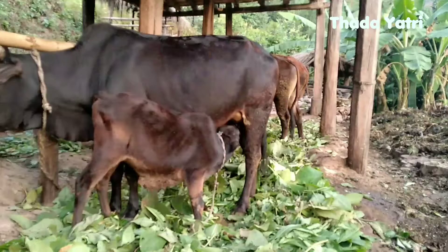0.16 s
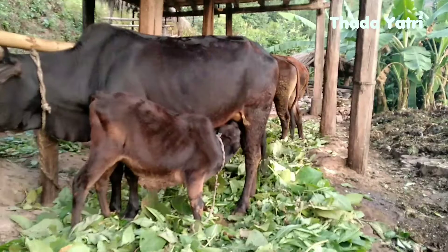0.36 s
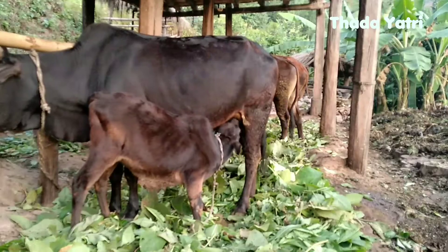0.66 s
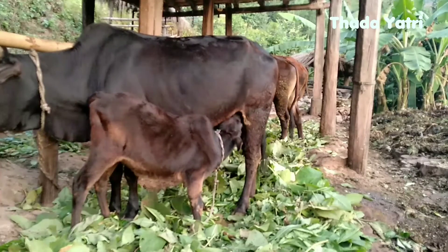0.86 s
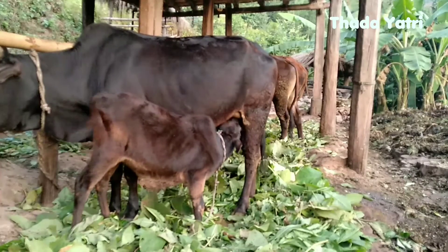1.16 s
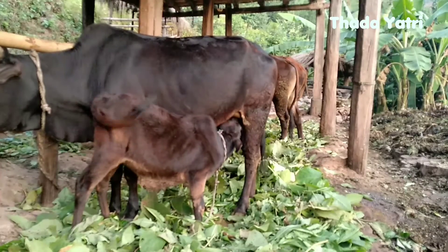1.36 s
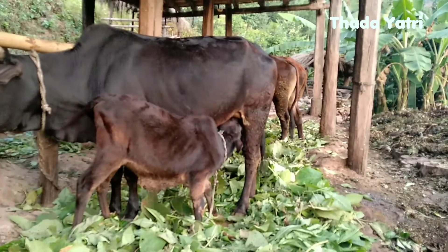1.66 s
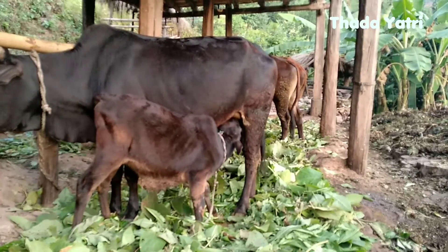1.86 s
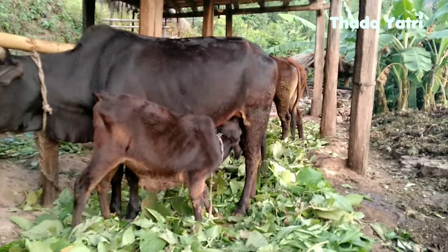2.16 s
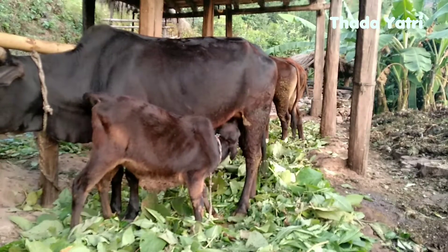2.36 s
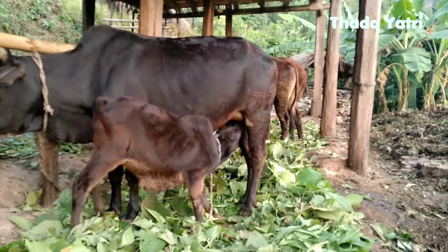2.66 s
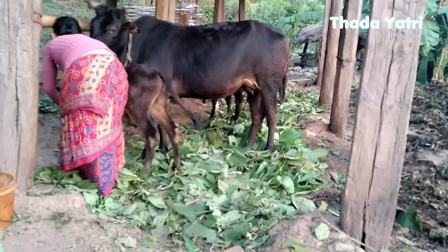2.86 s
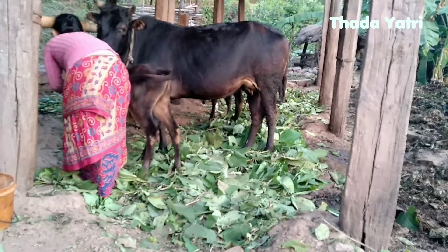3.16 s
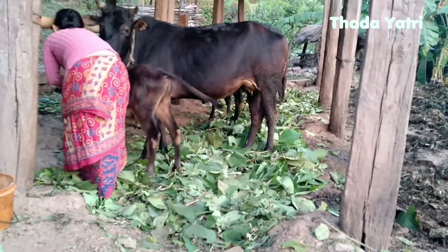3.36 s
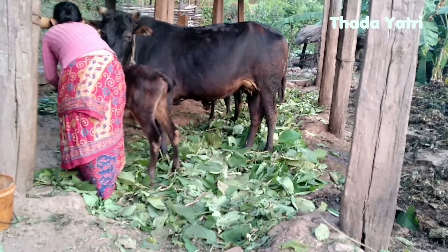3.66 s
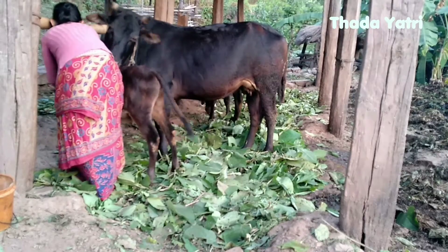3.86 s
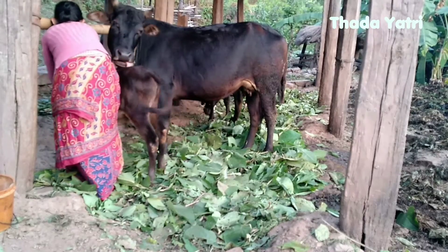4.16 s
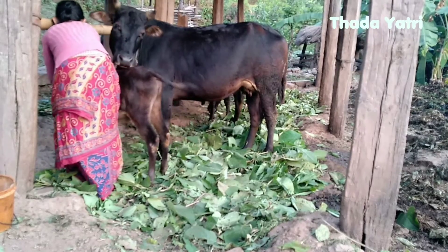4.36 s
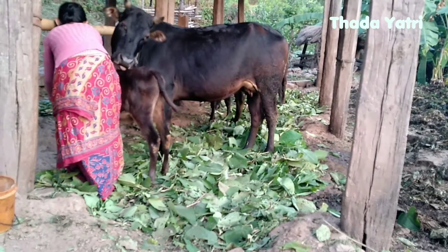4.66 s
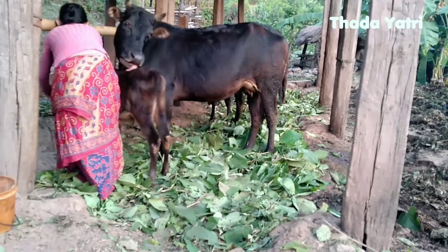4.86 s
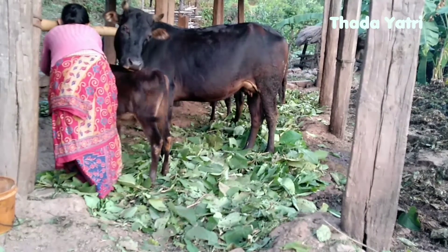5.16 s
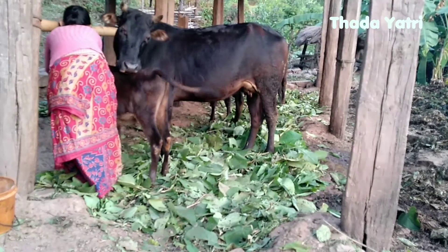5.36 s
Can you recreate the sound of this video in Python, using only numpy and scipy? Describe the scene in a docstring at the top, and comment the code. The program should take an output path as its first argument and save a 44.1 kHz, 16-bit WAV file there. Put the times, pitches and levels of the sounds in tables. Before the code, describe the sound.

Close churning in a pot, knocking and splashing, lasts a fraction of a second. Then an outdoor shed, heard from a few paces: buzzy bird calls, thin falling chick peeps, three soft clucks, crunching leaves, snapping stalks and low thuds. The peeping thins out midway, leaving rustles and knocks, before a hoarse, drawn-out rooster crow rises in the yard and is still going at the end.

```python
"""Heard first, for a moment: a butter churn knocks and sloshes in a clay pot; then come the sounds of an open cattle shed.
Knocks and grains excite the pot's resonances. Chicks, small birds and a hen call through gliding tones and
resonant throats; cattle trample and tug at leaves as filtered noise, grains and decaying rings.
A rooster starts to crow some way off as harmonics shaped by a throat, with echoes from the yard."""
import sys
import numpy as np
from scipy import signal
from scipy.io import wavfile
from scipy.ndimage import uniform_filter1d

SR = 44100
rng = np.random.default_rng(int(sys.argv[2]) if len(sys.argv) > 2 else 0)


def digitize_waveform(pressure):
    """Quantize a signal to 16-bit integers and store it at the path in sys.argv[1].

    Rows of a 2-D input are taken as channels; values are limited to [-1, 1].
    """
    field = np.atleast_2d(pressure).T
    bounded = np.clip(field, -1, 1)
    quanta = np.round(bounded * 32767).astype(np.int16)
    wavfile.write(sys.argv[1], SR, quanta)


N = 242550
TIME = np.arange(N) / SR  # s


def undb(db):
    """Amplitude ratio: twenty decibels are a factor of ten."""
    return 10 ** (np.asarray(db) / 20)


def unit(x):
    """Equal power: scale to rms 1."""
    return x / np.sqrt(np.mean(x ** 2))


def curves(table):
    """Linear interpolation: the columns of a table joined by straight lines in time."""
    s, *columns = np.transpose(table)
    return [np.interp(TIME, s, c) for c in columns]


def ring(x, hz, width_hz):
    """Resonance: one damped mode, gain 1 at its centre."""
    return signal.lfilter(*signal.iirpeak(min(hz, .45 * SR), hz / width_hz, SR), x)


def body(x, modes):
    """Modal superposition: a sum of resonances of alternating sign."""
    return sum((-1) ** k * undb(db) * ring(x, hz, w) for k, (hz, w, db) in enumerate(modes))


def walk(rate):
    """Slow random modulation: levels held 1 / rate s and smoothed twice, spread 1."""
    hold = int(SR / rate)
    steps = np.repeat(rng.standard_normal(N // hold + 1), hold)
    smooth = uniform_filter1d(uniform_filter1d(steps, hold), hold)
    return unit(smooth[:N])


def grains(per_s, spread_db):
    """Shot noise: random clicks, a few much larger than the rest."""
    return (rng.random(N) < per_s / SR) * rng.standard_normal(N) * undb(spread_db * rng.exponential(size=N))


def add(out, s, x):
    """Superposition: mix x into out from time s."""
    i = int(s * SR)
    out[i:i + len(x)] += x[:N - i]


def herd_stirring(crush):
    """Band-filtered noise: a dull trampling and a broad stirring of leaves, both wavering in level."""
    # Steady stirring of the herd. Each row: time in seconds, trampling in dB, leaf rustle in dB.
    herd_levels = [(.23, -61, -62), (.6, -73.5, -68), (1.69, -63.5, -67), (1.75, -45.5, -48.5),
                   (2.0, -56, -54), (2.4, -53, -53.5), (2.8, -63, -62), (2.98, -56.5, -55.5),
                   (3.13, -66.5, -64), (3.27, -56.5, -59), (3.9, -61, -61), (4.5, -66, -68),
                   (4.7, -58.5, -59), (5.5, -57, -56.5)]
    trample_db, stir_db = curves(herd_levels)
    thuds = ring(ring(rng.standard_normal(N), 250., 200.), 250., 200.)
    out = undb(trample_db + 3 * walk(30)) * unit(thuds)
    for hz, db in [(800, -0.5), (2000, -6.0), (5000, -6.5), (11000, -11.0)]:
        shifted = np.roll(crush, hz)  # keeps the bands from moving together
        out += undb(stir_db + db + 2.0 * walk(7.8)) * unit(ring(shifted, hz, hz))
    return out


def leaf_bursts(crush):
    """Enveloped noise: leaves crushed or pulled give a dull crunch and a hiss in two bands."""
    # Each row: start in seconds, length in seconds, crunch in dB, hiss in dB, hiss centre in Hz.
    rustles = [(1.149, 0.11, -58, -54, 2180), (1.43, 0.14, -57, -65, 6500),
               (1.727, 0.069, -55, -46.5, 7100), (1.802, 0.14, -48, -85, 4000),
               (2.084, 0.12, -49.5, -47, 4740), (2.173, 0.11, -44, -53, 2800),
               (2.411, 0.014, -57, -51.5, 6940), (2.543, 0.1, -54.5, -66, 4000),
               (2.67, 0.38, -80, -62, 10600), (3.175, 0.32, -60.5, -56.5, 4010),
               (3.53, 0.34, -96, -60, 4540), (3.767, 0.095, -55.5, -59, 2870),
               (4.19, 0.16, -69.5, -62, 4850), (4.328, 0.085, -64.5, -61, 2950),
               (5.32, .18, -83, -53, 2940)]
    crunch_centre_hz = 1030
    out = np.zeros(N)
    patchy = undb(2.2 * walk(90))

    def band(x, hz):
        """Cascaded resonance: two passes steepen the band."""
        width_hz = 1.1 * hz
        return unit(ring(ring(x, hz, width_hz), hz, width_hz))

    for s, length, crunch_db, hiss_db, hiss_hz in rustles:
        i, u = int(s * SR), np.linspace(0, 1, int(length * SR))
        now = slice(i, i + len(u))
        swell = 1.25 * np.sin(np.pi * u ** .5).clip(0) ** .75
        source = crush[::-1][now]
        crunch = undb(crunch_db) * band(source, crunch_centre_hz)
        hiss = undb(hiss_db) * band(source, hiss_hz)
        add(out, s, swell * patchy[now] * (crunch + hiss))
    return out


def snaps_and_knocks():
    """Impulse response: snapping stalks and knocking hooves ring and decay, with a crack of noise."""
    # Each row: start in seconds, level in dB, ring in Hz, crack in dB relative to the ring.
    snaps = [(1.152, -38.5, 960, -1), (1.453, -50.5, 1520, 13.5), (1.707, -41.5, 1257, -3),
             (1.731, -30.5, 2070, 1), (1.736, -32, 3700, 0.5), (1.743, -29.5, 533, 0.5),
             (2.119, -18, 299, -8), (2.864, -28, 213, -9), (3.11, -39, 1950, 1), (3.306, -31.5, 227, -10),
             (3.784, -38, 710, 0), (3.85, -38.5, 1314, 1), (3.908, -33.5, 1316, 1.5),
             (4.543, -47.5, 2220, 7.5)]
    t60_at_1khz_s, t60_slope = 0.029, 0.64  # lower rings last longer
    out, t = np.zeros(N), TIME[:SR // 5]
    for s, db, hz, crack_db in snaps:
        t60 = t60_at_1khz_s * (1000 / hz) ** t60_slope
        tone = np.sin(2 * np.pi * hz * t) * (1 - np.exp(-t * hz)) * 1000. ** (-t / t60)
        crack = np.exp(-t / 0.014) * ring(rng.standard_normal(len(t)), 1720.0, 1040.0)
        add(out, s, undb(db) * (tone + undb(crack_db) * crack))
    return out


def cattle():
    """Friction and impact: grains over noise feed stirring and crushed leaves, beside snaps and knocks."""
    crush = unit(grains(1500, 2)) + 1.5 * rng.standard_normal(N)
    return herd_stirring(crush) + leaf_bursts(crush) + snaps_and_knocks()


def whistle(length, top_hz, end_hz, top, bend, db, start_hz, loudest, buzz, second_db):
    """Frequency modulation: a near-sine glides by way of its top, with an overtone; buzz chops the note."""
    u = np.linspace(0, 1, int(length * SR))
    before_top = np.clip(1 - u / top, 0, 1) ** 2.4
    after_top = np.clip((u - top) / (1 - top), 0, 1) ** bend
    hz = top_hz - (top_hz - start_hz) * before_top - (top_hz - end_hz) * after_top
    waver = 1 + .012 * np.roll(walk(70), -SR)[:len(u)]
    phase = 2 * np.pi * np.cumsum(hz * waver) / SR
    swell = np.sin(np.pi * u ** (np.log(.5) / np.log(loudest))).clip(0)
    # about 170 chops a second
    chop = 1 + buzz * np.sin(2 * np.pi * 170 * length * u + 3 * np.sin(60 * length * u))
    return undb(db) * swell, chop * np.sin(phase), undb(second_db) * np.sin(2 * phase)


def chicks():
    """Source and filter: gliding peeps are loudest where the note crosses the windpipe resonance."""
    # Each row: start in seconds, length in seconds, top in Hz, rise to the top in seconds, level in dB.
    peeps = [(0.24, 0.035, 3700, 0.0028, -62.5), (0.392, .033, 4000, 0.0015, -59),
             (0.411, 0.08, 4250, 0.022, -57), (0.43, 0.086, 3800, 0.0039, -57),
             (0.546, 0.094, 4200, 0.015, -58.5), (0.681, 0.12, 4600, 0.015, -64.5),
             (0.694, 0.11, 4330, 0.05, -61), (0.727, 0.05, 2900, 0.014, -56),
             (0.765, 0.047, 3836, .006, -53.5), (0.842, 0.059, 3200, 0.014, -56),
             (0.891, 0.096, 4850, 0.032, -64), (0.912, 0.073, 3500, 0.0019, -64.5),
             (0.98, 0.034, 3600, 0.0017, -58.5), (1.101, 0.036, 3210, .002, -63),
             (1.136, 0.029, 3600, 0.0035, -54.5), (1.248, 0.042, 3710, 0.0017, -56),
             (1.3, 0.065, 3260, 0.015, -57.5), (1.476, 0.089, 3500, 0.021, -56.5),
             (1.632, 0.093, 3910, 0.021, -61.5), (1.805, 0.06, 4690, 0.02, -47),
             (2.245, 0.031, 3600, 0.0012, -49), (2.361, 0.083, 4250, 0.02, -53.5),
             (2.373, 0.08, 3300, 0.018, -50), (2.408, 0.06, 3800, 0.0033, -50.5),
             (2.477, 0.059, 3180, 0.013, -43), (2.543, 0.043, 3750, 0.0014, -50.5),
             (2.58, 0.026, 3800, 0.0025, -48.5), (2.62, 0.069, 3500, 0.014, -50),
             (2.686, 0.27, 4800, .015, -54.5), (2.743, 0.24, 4440, 0.01, -62),
             (2.755, 0.067, 3320, 0.018, -50.5), (2.919, 0.058, 3504, 0.02, -46.5),
             (3.034, 0.07, 3840, 0.0019, -47), (3.302, 0.03, 3750, 0.0009, -41.5),
             (3.411, 0.039, 3400, 0.0022, -56), (5.146, 0.045, 3750, 0.001, -50),
             (5.335, 0.11, 3586, 0.017, -55)]
    start_hz, end_hz, fade_s = 2600, 2437, 0.0029
    windpipe_hz, windpipe_width_hz = 3250, 800
    overtone_hz, overtone_db = 6350, -13
    late_dive_hz_s = 105  # the longer and higher a fall (Hz times s), the later it dives
    out = np.zeros(N)
    for s, length, top_hz, rise, db in peeps:
        # a note with no rise falls straight
        bend = 1 + (length - rise) * (top_hz - end_hz) / late_dive_hz_s * min(rise / .006, 1)
        _, note, overtones = whistle(length, top_hz, end_hz, rise / length, bend, db,
                                     start_hz, 0.41, 0.15, overtone_db)
        t = TIME[:len(note)]
        fade = np.clip(np.minimum(t, length - t) / fade_s, 0, 1)
        growth = undb(-8 * (0.5 - t / length))  # grows toward the fall
        piped = ring(note, windpipe_hz, windpipe_width_hz)
        voice = .12 * note + piped + ring(overtones, overtone_hz, 2000)
        add(out, s, undb(db) * fade * growth * voice)
    return out * undb(3 * walk(70))  # the notes flicker


def wild_birds():
    """Frequency and amplitude modulation: buzzy rising calls, two falling whistles and a low coo."""
    # Buzzy calls of a small bird. Each row: start in seconds, top in Hz, level in dB.
    buzzy_calls = [(0.246, 6770, -47), (0.453, 6130, -55.5)]
    # Gliding notes. Each row: start in seconds, length in seconds, start in Hz, end in Hz, level in dB.
    glides = [(0.493, 0.18, 990, 865, -60), (2.746, 0.24, 2574, 1280, -54.5),
              (2.885, 0.17, 299.3, 352, -49.5)]
    call_s, rise_hz, sag_hz, top_at, loudest_at, buzz = 0.17, 1150, 60, 0.6, 0.5, 0.4
    calls = [(s, call_s, hz, hz - sag_hz, top_at, 1, db, hz - rise_hz, loudest_at, buzz)
             for s, hz, db in buzzy_calls]
    calls += [(s, length, hz, end_hz, .02, .63, db, hz, .4, .1)
              for s, length, hz, end_hz, db in glides]
    out = np.zeros(N)
    for s, *shape in calls:
        swell, note, overtones = whistle(*shape, second_db=-17.0)
        envelope = swell ** 1.318 / swell.max() ** 0.29  # a more pointed swell
        add(out, s, envelope * (note + overtones))
    return out


def hen():
    """Source and filter: short, quickening pulse trains with breath excite the hen's throat."""
    # Each row: start in seconds, level in dB.
    clucks = [(0.553, -54), (1.283, -44), (2.506, -41)]
    # Throat resonances. Each row: centre in Hz, width in Hz, level in dB.
    hen_throat = [(330, 190, 0), (675, 210, 4), (1120, 200, 2)]
    cluck_s, start_hz, end_hz = 0.056, 278, 384
    out = np.zeros(N)
    u = np.linspace(0, 1, int(cluck_s * SR))
    turns = np.cumsum(start_hz + (end_hz - start_hz) * u) / SR
    pulses = np.diff(np.floor(turns), prepend=0)
    swell = np.sin(np.pi * u ** 0.26) ** 0.48
    for s, db in clucks:
        breath = 0.13 * rng.standard_normal(len(u))
        add(out, s, -undb(db) * swell * (pulses + breath))
    return 20.8 * body(out, hen_throat)


def churn():
    """Modal excitation: grains and paddle knocks ring the pot; droplets plop, air hums and spray fizzes."""
    # Slosh in the pot. Each row: time in seconds, slosh in dB, spray in dB.
    slosh_levels = [(0, -22.5, -34), (.1, -32.5, -43.5), (.125, -18.5, -48.5), (.17, -20.5, -39),
                    (.2, -23, -37), (.228, -19.5, -27)]
    # Pot resonances. Each row: centre in Hz, width in Hz, level in dB.
    pot_modes = [(265.6, 66, -9.5), (422, 101, -4), (530, 60, 3), (830, 121.5, -7.5), (1030, 90, -8.5),
                 (1700, 950, -23.5)]
    # Paddle knocks. Each row: start in seconds, blow in dB, splash in dB.
    knocks = [(0.0, -9, -33), (0.045, -18, -30.5), (0.120, -7, -30.5), (0.152, -4, -19),
              (0.209, -19.5, -33), (0.2183, -2, -30.5), (0.2234, -3, -27)]
    # Plopping droplets. Each row: start in seconds, initial pitch in Hz, peak in dB.
    drops = [(.015, 1950, -27), (.038, 1820, -32), (.099, 6400, -35.5), (.131, 2480, -29.5),
             (.185, 4020, -28)]
    air_start_hz, air_sag_hz_per_s, air_db = 312, 265, -6.5  # level against the slosh
    slosh_db, spray_db = curves(slosh_levels)
    blows, splash, t = np.zeros(N), np.zeros(N), TIME[:SR // 50]
    for s, db, splash_db in knocks:
        add(blows, s, undb(db) * np.hanning(int(0.0016 * SR)))
        spatter = ring(rng.standard_normal(len(t)), 3700.0, 11100.0)
        add(splash, s, undb(splash_db) * np.exp(-t / 0.0025) * spatter)
    for s, hz, db in drops:
        plop = np.e * t / .0011 * np.exp(-t / .0011)
        add(splash, s, undb(db) * plop * np.sin(2 * np.pi * hz * t * (1 + 4 * t)))  # rising pitch
    # spray: eight noise bands, each in its own patches
    fizz = sum(undb(4 * walk(120) - 2.2 * k) * unit(ring(rng.standard_normal(N), hz, .3 * hz))
               for k, hz in enumerate(1300 * 1.35 ** np.arange(8)))
    slosh = unit(grains(900, 2.5)) + .3 * rng.standard_normal(N)
    # the air above the liquid hums and sinks in pitch
    air_turns = (air_start_hz - air_sag_hz_per_s * TIME / 2) * TIME
    air = undb(air_db + 3 * walk(40)) * np.sin(2 * np.pi * air_turns)
    liquid = undb(slosh_db) * (unit(body(slosh, pot_modes)) + air)
    return 3.15 * body(blows, pot_modes) + liquid + splash + undb(spray_db) * unit(fizz)


def rooster():
    """Source and filter: throat-shaped harmonics; hoarseness adds wobble, throb, half-way lines and breath."""
    # The crow. Each row: time in seconds, pitch in Hz, level in dB, hoarseness (limited to 0-1).
    crow = [(4.535, 628, -73, 0.22), (4.547, 663, -44.5, 0.38), (4.6, 692.4, -44, 0),
            (4.655, 704, -32, 0.14), (4.715, 727.7, -38.5, 0.17), (4.745, 687.4, -55.5, 1.1),
            (4.805, 719, -43, 0.69), (4.818, 841.4, -33.5, 0.1), (4.852, 837, -35.5, 0.28),
            (4.875, 692, -44, 1.15), (4.94, 672, -49, 0.76), (4.995, 816, -29, 0.06),
            (5.04, 842.5, -30, 0.05), (5.095, 830, -35, 0.21), (5.12, 786.4, -34.5, 0.12),
            (5.27, 737.7, -37, 0.26), (5.34, 662.6, -46.5, 0.8), (5.39, 674, -41.5, 0.33),
            (5.45, 680, -47.5, 0.51), (5.5, 699, -39, 0.03)]
    # Throat response for the upper harmonics. Each row: frequency in Hz, level in dB.
    throat = [(2000, -29), (3900, -42), (4400, -15), (4950, -26), (5350, -24), (5800, -31), (6200, -36),
              (6750, -21), (7200, -38), (8400, -36), (11000, -50)]
    # Echoes from the yard. Each row: delay in seconds, level in dB.
    echoes = [(.058, -9), (0.361, -17.5)]
    # the fundamental against the second harmonic, the main note: when clear, and its gain when hoarse
    fundamental_db, fundamental_hoarse_db = -21.5, 22.5
    hz, db, hoarse = curves(crow)
    hoarse = np.clip(hoarse, 0, 1)
    first_db = fundamental_db + fundamental_hoarse_db * hoarse ** 0.68
    wobble = 1 + 0.0456 * hoarse * walk(400) + 0.00276 * walk(60)
    phase = 2 * np.pi * np.cumsum(hz * wobble) / SR
    shape_hz, shape_db = np.transpose(throat)
    voice = undb(first_db + 4 * walk(70)) * np.sin(phase) + undb(2 * walk(45)) * np.sin(2 * phase)
    bright = undb(-.45 * (db + 38))  # upper partials follow the level less than the main note
    for k in range(3, 16):  # rough partials that come and go, and weaken when hoarse
        throat_db = np.interp(np.log(k * hz), np.log(shape_hz), shape_db)
        partial = undb(throat_db + 3.5 * walk(18) - 10 * hoarse)
        voice += bright * partial * (1 + .6 * walk(300)) * np.sin(k * phase)
    # strong and weak cycles alternate: a line half-way between the second and third harmonics
    voice += .9 * hoarse ** 3 * undb(2 * walk(60)) * np.sin(5 * phase / 2)
    throb_phase = 2 * np.pi * np.cumsum(45 + 30 * walk(40)) / SR
    throb = 1 + np.clip(2.2 * hoarse, 0, .55) * np.sin(throb_phase)
    breath = unit(ring(rng.standard_normal(N), 1460.0, 500.0))
    breath += 0.76 * unit(ring(rng.standard_normal(N), 625.0, 170.0))
    for f in (2750., 4650., 6750.):
        breath += bright * 0.22 * undb(2.0 * walk(60)) * unit(ring(rng.standard_normal(N), f, 220.0))
    breath *= undb(-8.5) * (0.074 + hoarse)
    call = undb(db) * (np.sqrt(2) * voice * throb + breath) * (TIME > crow[0][0])
    out = call.copy()
    for lag, echo_db in echoes:
        add(out, lag, undb(echo_db) * call)
    return out


def shed_tail(voices):
    """Diffuse reverberation: roof and posts scatter the voices into a short, exponentially dying tail."""
    t60_s, tail_db = .6, -10
    t = TIME[:int(t60_s * SR)]
    tail = rng.standard_normal(len(t)) * 1000. ** (-t / t60_s) * (t > .008)
    return undb(tail_db) * signal.fftconvolve(voices, tail / np.sqrt(np.sum(tail ** 2)))[:N]


def scene():
    """Superposition: the shed's sources are summed; the churn alone is heard before them."""
    cut_s = .2285  # the churn gives way to the shed
    near, far = chicks() + wild_birds() + hen(), rooster()
    shed = near + far + shed_tail(far + 0.65 * near) + cattle()
    # the bass of both places is thinned before they are joined
    bass_cut = signal.butter(4, 150, "high", fs=SR, output="sos")
    both = signal.sosfilt(bass_cut, [churn(), shed])
    return np.where(TIME < cut_s, *both)[None]


def record(dry):
    """Low-pass filtering: the top is cut off steeply."""
    top_hz = 15600
    return signal.sosfilt(signal.ellip(10, .2, 70, top_hz, fs=SR, output="sos"), dry)


dry = scene()
out = record(dry)
digitize_waveform(out)
```